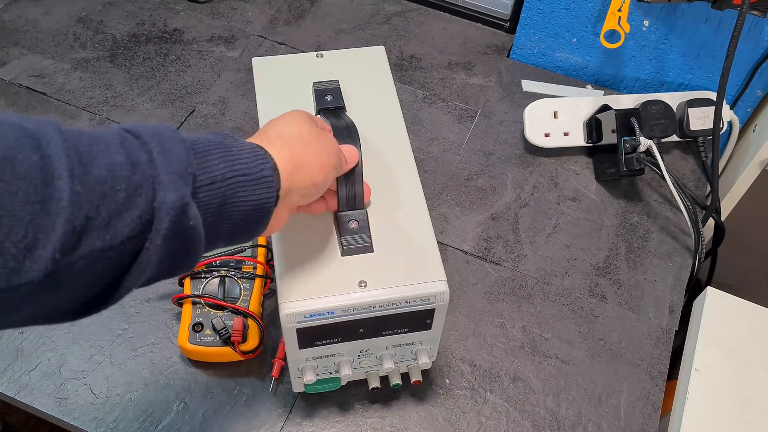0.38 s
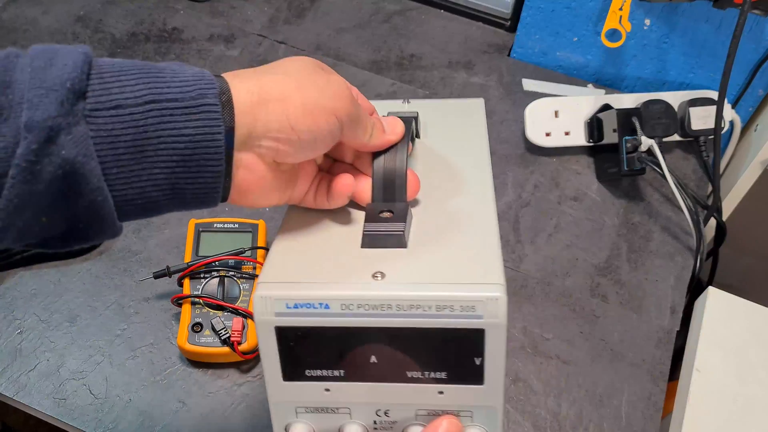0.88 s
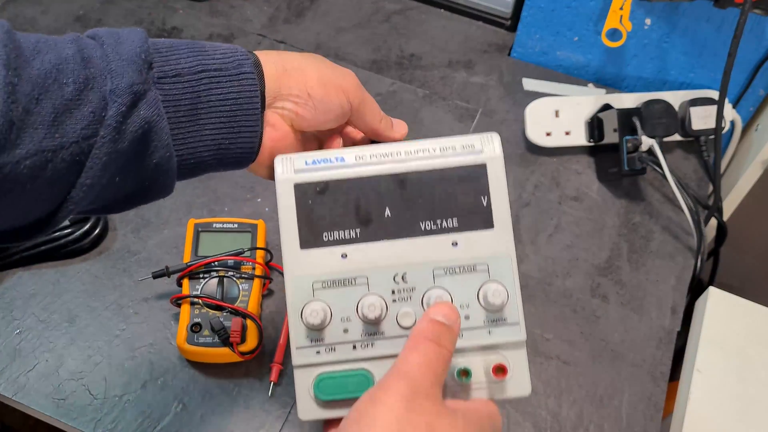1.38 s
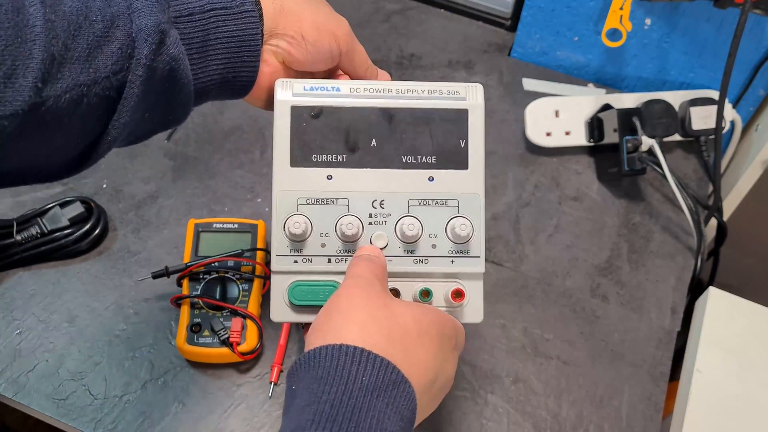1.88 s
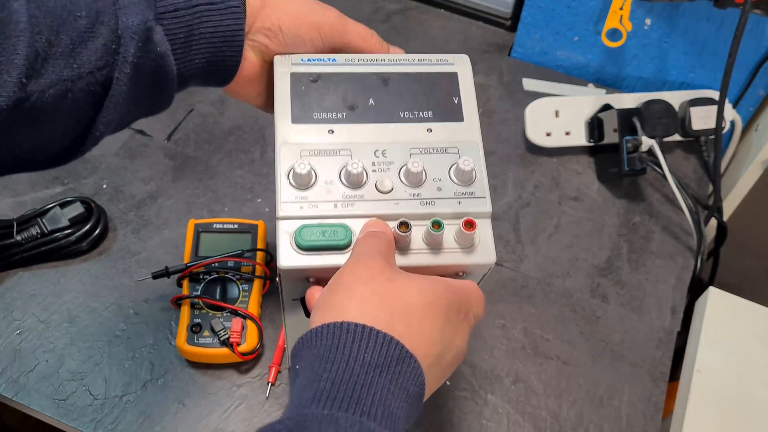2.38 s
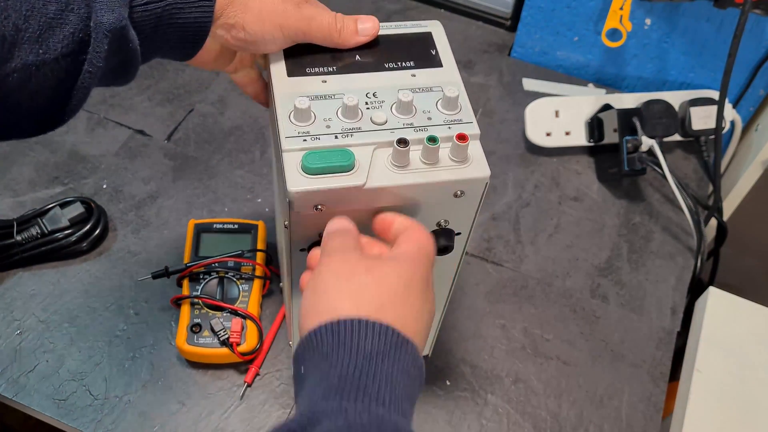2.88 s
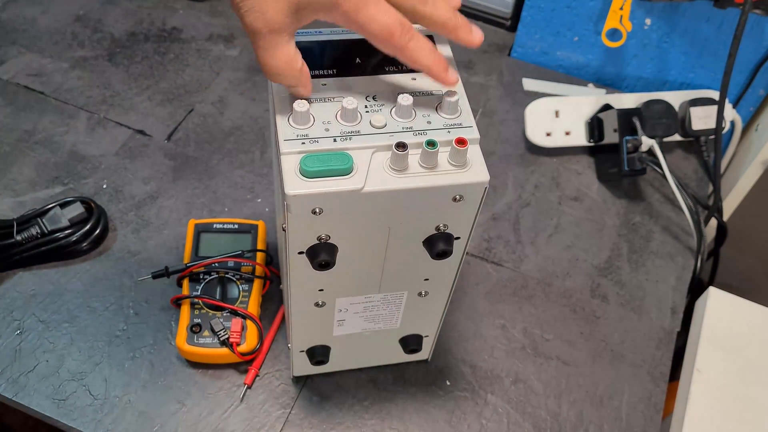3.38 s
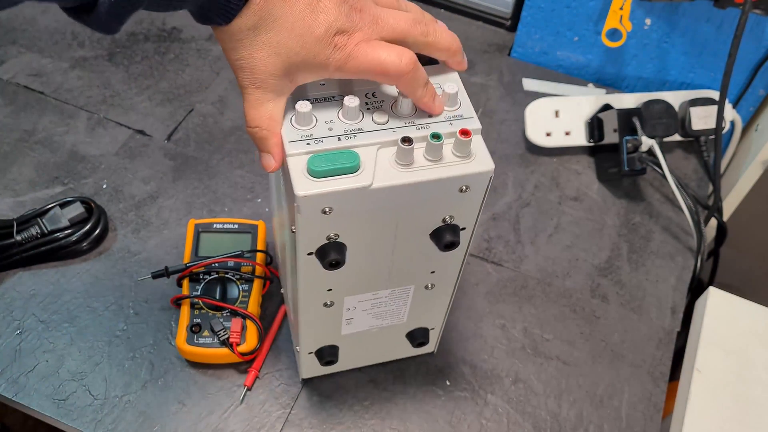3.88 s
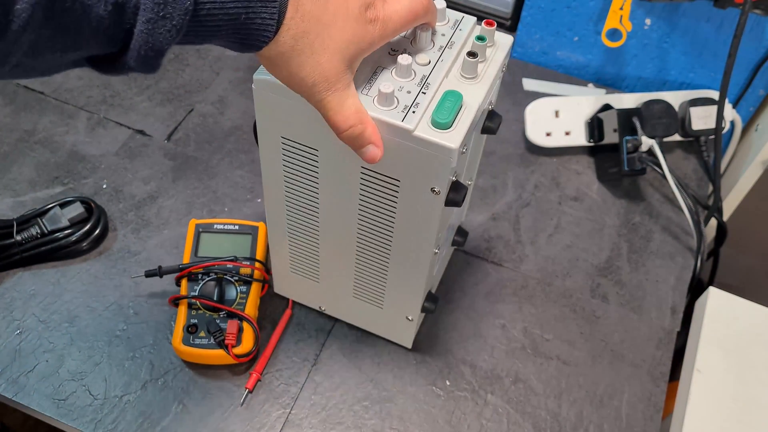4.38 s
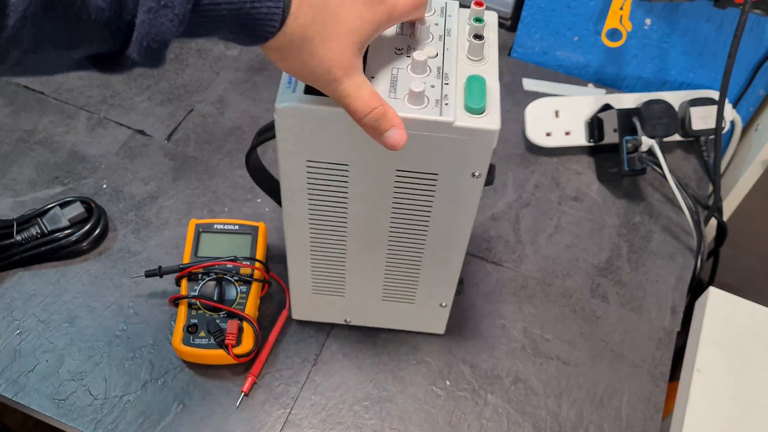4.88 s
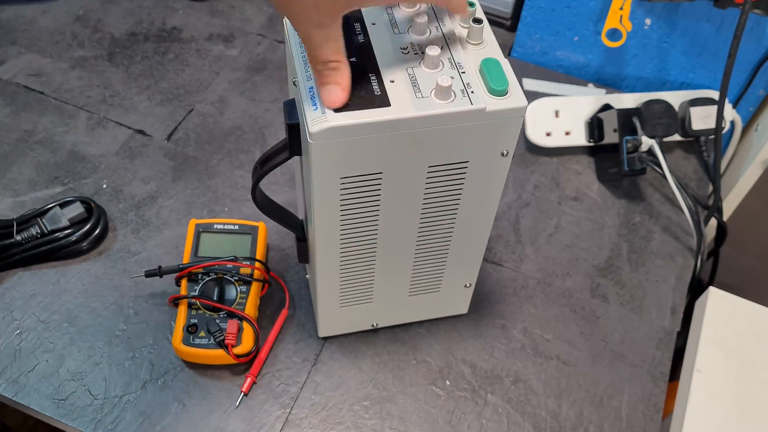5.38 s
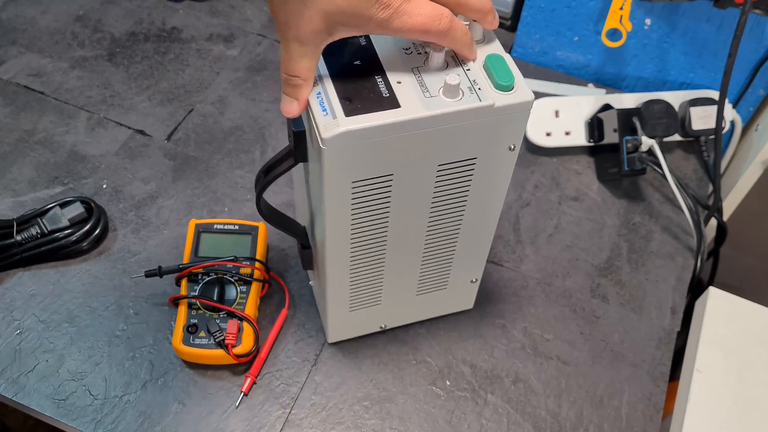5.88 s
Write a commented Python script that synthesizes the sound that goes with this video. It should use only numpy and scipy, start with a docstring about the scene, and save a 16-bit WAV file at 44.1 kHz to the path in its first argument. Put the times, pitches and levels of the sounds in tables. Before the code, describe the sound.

A metal-cased bench instrument is gripped, tipped and set on end with a hollow desk thump, then scraped around with small knocks and ticks.

```python
"""In a small room, a metal-cased bench instrument is gripped by its strap, tipped up, set on end
and turned on a wooden desk. The desk top booms in three low tones under its weight; knocks and ticks
ring the sheet-metal case through banks of resonances. Skin and metal scuff and slide as clumps of
random friction grains, and the desk trembles under the hands.
A faint fan-like hiss of coloured noise with two thin tones fills the room."""
import sys
import numpy as np
from scipy import signal
from scipy.fft import rfft, irfft, next_fast_len
from scipy.io import wavfile

SR = 44100
rng = np.random.default_rng(int(sys.argv[2]) if len(sys.argv) > 2 else 0)


def attenuation_scalar(level_db):
    """Turn a level in dB into a linear amplitude multiplier (20 dB per decade)."""
    decades = np.asarray(level_db, float) / 20
    return 10 ** decades


def materialize(psi):
    """Save the field psi as 16-bit PCM at rate SR to the path in sys.argv[1].

    A 1-D psi becomes a single channel; in a 2-D psi each row is a channel.
    """
    bounded = np.clip(np.atleast_2d(psi).T, -1, 1)
    quanta = np.round(bounded * 32767).astype(np.int16)
    wavfile.write(sys.argv[1], SR, quanta)


N = 264600  # samples: six seconds

# Low thuds of the desk: weight landing on it, and stick-slip bumps as the case is turned.
# Each row: start in seconds, peak level in dB, share of the upper desk tone from 0 to 1,
# time to fall by 60 dB in seconds.
DESK_THUDS = [(0.108, -59.5, 0.8, 0.3), (0.4, -52, 0.9, 0.17), (1.385, -22.5, 0.7, 0.18),
              (1.468, -26.5, 1, 0.086), (1.554, -22.5, 0.6, 0.22), (1.606, -18.5, 0.8, 0.1),
              (1.62, -15.5, 0.5, 0.27), (1.659, -20, 0.32, 0.15), (2.015, -34.5, 0.5, 0.23),
              (2.072, -36, 0.42, 0.52), (2.107, -36, 1, 0.13), (2.217, -28, 1, 0.16), (2.689, -52, 1, 0.27),
              (2.827, -32.5, 0.55, 0.8), (2.849, -31.5, 0, 0.39), (2.921, -43, 1, 0.94),
              (3.882, -37, 1, 0.18), (4.109, -45, 0.83, 0.18), (4.181, -41.5, 1, 0.25),
              (4.25, -45, 0, 0.36), (4.287, -43.5, 0.26, 0.34), (4.887, -43, 0.9, 0.2),
              (4.928, -41.5, 0.25, 0.19), (5.719, -49.5, 1, 0.12), (5.974, -50, 0.9, 0.3)]
# The desk's own tones, in Hz: sway, lower, upper.
DESK_TONES = (44.0, 65.5, 80.0)
SWAY_DB, PUSH_MS = -28, 13.7  # level of the sway tone; time constant of the soft push

# Knocks that ring the big panels. Each row: start in seconds, peak level in dB,
# favoured pitch in Hz, damping by the hand as a factor on the panel widths.
PANEL_KNOCKS = [(0.389, -46.5, 646, 2.5), (0.483, -40.5, 477, 1.3), (0.821, -36, 560, 0.64),
                (0.823, -42, 247, 0.38), (1.388, -25, 217, 0.86), (1.476, -34, 213, 0.55),
                (1.557, -38, 226, 1.1), (1.6, -18.5, 269, 0.4), (1.636, -21, 217, 2.3),
                (1.699, -29, 219, 2.2), (2.105, -38, 233, 0.94), (2.218, -29.5, 220, 0.6),
                (2.446, -46, 493, 0.97), (2.824, -33.5, 212, 0.44), (2.85, -30.5, 730, 1.2),
                (3.204, -40.5, 464, 4.2), (3.236, -37.5, 560, 2.4), (3.879, -34, 218, 0.63),
                (4.878, -38, 269, 2.6), (4.879, -42, 668, 1.2)]
# Resonances of the big panels. Each row: pitch in Hz, basic width in Hz, basic level in dB.
PANEL_MODES = [(148, 20, -1), (205, 22, 0), (250, 26, 2), (333, 18, 5), (434, 28, -4), (530, 20, 4),
               (590, 22, -4), (668, 20, -1), (752, 26, -7), (830, 30, -9)]
FAR_PANELS_DB = -13  # panels far from the favoured pitch drop no further than this, before luck

# Ticks and scuffs on the case. Each row: start in seconds, peak level of the bright part in dB,
# brightest pitch in Hz, 60 dB fall of the contact in seconds, body level in dB against the bright part.
CASE_TICKS = [(0.1004, -45, 2050, 0.032, 3.5), (0.387, -54, 2030, 0.063, 10.5),
              (0.4627, -53.5, 2070, 0.04, -14), (0.5755, -33, 2900, 0.016, 2),
              (0.822, -49.5, 4200, 0.031, -3), (0.897, -51.5, 4700, 0.026, -6),
              (1.388, -45, 2100, 0.01, 7.5), (1.6, -41, 2110, 0.077, 11.5), (2.0176, -44.5, 2160, 0.16, 1),
              (2.102, -35.5, 5980, 0.056, 1.5), (2.2196, -49, 2270, 0.047, 3),
              (2.2328, -49.5, 3940, 0.08, 8), (2.376, -53.5, 5600, 0.074, 3.5),
              (2.8255, -47.5, 2000, 0.087, 16), (2.851, -44, 3430, 0.027, -3),
              (2.8777, -45.5, 1990, 0.03, 6), (3.01, -60.5, 4370, 0.047, 1),
              (3.2003, -52.5, 2630, 0.025, 8.5), (3.236, -35, 2400, 0.026, 2.5),
              (3.395, -60, 1960, 0.028, 8.5), (3.506, -53, 2440, 0.12, -18), (3.5273, -42, 5050, 0.053, -9),
              (3.879, -59, 2200, 0.11, 13.5), (4.8786, -61, 2990, 0.099, 17), (5.035, -45, 3170, 0.02, -27),
              (5.194, -73, 7850, 0.014, -20), (5.5058, -39.5, 3900, 0.044, -22)]
# Upper resonances of the case shell. Each row: pitch in Hz, basic width in Hz, basic level in dB.
SHELL_MODES = [(1980, 120, -1), (2200, 120, -2), (2510, 110, 0), (2900, 130, 1), (3280, 140, 2),
               (3900, 110, 3), (4400, 160, -4), (5200, 180, -2), (5700, 200, -3), (6450, 220, -2),
               (7050, 250, -1), (8000, 250, -4)]
# Lower resonances of the case. Each row: pitch in Hz, basic width in Hz, basic level in dB.
BODY_MODES = [(953, 190, 6), (1215, 98, 12.5), (1406, 260, 5), (1542, 80, 11.5), (1767, 243, 6.5)]
# Brighter ticks carry more air. Each row: brightest pitch in Hz, air level in dB against the bright part.
AIR_IN_TICKS = [(2000, -40), (4500, -17), (6100, 3)]

# Sliding and rubbing strokes. Each row: time of the peak in seconds, scrape level in dB, rise in seconds,
# fall in seconds, air level in dB against the scrape, panel ring in dB against the scrape.
STROKES = [(0.116, -45.5, 0.038, 0.069, -13, -4.5), (0.48, -69, 0.31, 0.27, -5, 6),
           (0.822, -51, 0.0046, 0.06, 2, -3), (1.391, -42, 0.0051, 0.099, -19.5, 6),
           (1.614, -42, 0.091, 0.18, -13, 6), (2.029, -52.5, .1, 0.16, -11, 4.5),
           (2.109, -50, 0.11, 0.17, -10.5, 2.5), (1.74, -57.5, 0.15, 0.11, -5, 11),
           (2.378, -71, 0.022, 0.099, -8, 2), (2.44, -71, 0.13, 0.37, -10, 17),
           (2.842, -53.5, 0.081, 0.12, -14, 5), (3.234, -54, 0.037, 0.11, -14.5, 7),
           (3.537, -60, .1, 0.033, -11, -3), (4.13, -47.5, .27, 0.25, -14, -3),
           (4.254, -47, 0.16, .19, -14.5, 1.5), (4.874, -57, 0.091, 0.29, -12, -0.5),
           (5.04, -62, 0.52, 0.14, -12, 1.5), (5.474, -68.5, 0.19, 0.061, -1.5, -13),
           (6.0, -56.5, 0.17, .05, -12.5, -3)]
# Colour of the friction. Each row: pitch in Hz, relative level in dB per Hz.
SCRAPE_COLOUR = [(530, -30), (900, -11.5), (1750, -8), (2250, -8.5), (3930, -11), (9000, -18), (11700, -54),
                 (19800, -120)]
# The back edge sings as the case is turned on it.
# Each row: pitch in Hz, width in Hz, level in dB against the scrape.
EDGE_SQUEAL = [(3928, 99, -15.5), (3100, 950, -10.5), (6580, 900, -16)]
# Start and end of the turning, in seconds.
TURNING = (3.9, 5.3)
STROKE_SWING_DB = 25  # the scrape gains this much over the rise and loses it over the fall
STROKE_ROUNDING = 1.155  # 1 = a pointed peak; more = the stroke holds, then stops quickly
RASP_DB, RASP_FOLLOWS_AIR = -8, 0.68  # rasp against scrape in dB, plus this share of the air level
PANEL_SWING, AIR_SWING = 0.86, 0.97  # shares of the stroke's swing; the rasp swings with the air
SLIDE_BODY_DB = -3.5  # sliding stirs the lower modes less than a tap

# The desk trembling under the hands. Each row: time in seconds, level in dB.
TREMBLE_LEVEL = [(0.0, -69.5), (0.47, -65.5), (1.14, -71), (1.42, -68), (1.57, -35.5), (1.82, -52.5),
                 (2.17, -49.5), (2.62, -65), (3.68, -63), (4.24, -52), (4.58, -69), (5.1, -59), (5.4, -67),
                 (6.0, -65)]

# Stereo width of the nearby reflections. Each row: pitch in Hz, side filter level in dB.
HANDLING_WIDTH = [(60, -18), (180, -29.5), (550, -11.5), (1650, -0.5), (4970, -0.5), (15000, -0.5)]
# Balance between the ears. Each row: pitch in Hz, left over right in dB.
LEFT_LEAN = [(60, -1), (240, 0), (950, -3), (3770, -4), (15000, -4)]
SCATTER_T60_S = 0.08  # 60 dB fall of the nearby reflections
ROOM_T60_S, ROOM_DB, WALL_CUT_HZ = 0.14, -6, 3900  # fall before wall dulling, send level, dulling pitch

# Colour of the room hiss. Each row: pitch in Hz, relative level in dB.
HISS_COLOUR = [(53, -64), (90, -46), (184, -9.5), (368, -1.5), (393, -7), (544, -6), (721, -9.5),
               (858, -13), (1020, -14.5), (1640, -15.5), (1790, -20), (13200, -40), (16000, -44)]
# Stereo width of the hiss. Each row: pitch in Hz, side over mid in dB.
HISS_SIDE = [(60, 22), (240, -13.5), (950, 0), (3770, 0), (15000, 1)]
# Thin tones in the room. Each row: pitch in Hz, average (rms) level in dB.
THIN_TONES = [(366.1, -74), (1669, -79)]
HISS_DB = -63.5  # average level of the middle of the hiss

# Colour of the microphone. Each row: pitch in Hz, level in dB.
MICROPHONE_COLOUR = [(6000, -1.5), (7500, -1.5), (8800, -8.5), (10500, -4), (12500, 1), (15000, 3)]
CUTOFF_HZ = 16400


def rms_one(x):
    """Scale a sound to an average (rms) level of 1."""
    return x / np.sqrt(np.mean(x ** 2) + 1e-20)


def peak_one(x):
    """Scale a sound to a peak of 1."""
    return x / (np.abs(x).max() + 1e-20)


def in_time(rows, **outside):
    """Draw straight lines between timed rows, one curve for each column."""
    s, *columns = np.transpose(rows)
    return [np.interp(np.arange(N) / SR, s, column, **outside) for column in columns]


def at_hz(points, hz):
    """Read a curve at a pitch, with pitch on a log scale."""
    point_hz, values = np.transpose(points)
    return np.interp(np.log(hz), np.log(point_hz), values)


def band(x, low_hz, high_hz):
    """Keep only what lies between two pitches."""
    edges_hz = [low_hz, min(high_hz, 0.45 * SR)]
    return signal.sosfilt(signal.butter(2, edges_hz, "band", fs=SR, output="sos"), x)


def shaped(x, spectrum):
    """Colour a sound by a curve of dB over pitch."""
    hz = np.maximum(np.arange(N // 2 + 1) * SR / N, 1)
    return irfft(rfft(x) * attenuation_scalar(at_hz(spectrum, hz)), N)


def resonate(x, hz, width_hz):
    """Pass a sound through one resonance with gain 1 on top; a narrower one rings longer."""
    r = np.exp(-np.pi * width_hz / SR)
    feedback = [1, -2 * r * np.cos(2 * np.pi * hz / SR), r * r]
    return signal.lfilter([(1 - r * r) / 2, 0, (r * r - 1) / 2], feedback, x + 1e-18)


def ring_modes(x, modes, extra_db, widen):
    """Ring resonances side by side, with alternating signs."""
    out = 0
    for k, ((hz, width_hz, db), more_db) in enumerate(zip(modes, extra_db)):
        out = out + (-1) ** k * attenuation_scalar(db + more_db) * resonate(x, hz, widen * width_hz)
    return out


def add(out, s, sound):
    """Mix a sound in at a time in seconds."""
    at = round(s * SR)
    out[at:at + len(sound)] += sound[:N - at]


def grit(shape, spread_db):
    """Dense contact grains: random sign, sizes with a long tail."""
    size_db = spread_db * np.minimum(rng.exponential(1, shape), 4)
    return rng.standard_normal(shape) * attenuation_scalar(size_db)


def contact(t60, grains):
    """A burst of grains that starts within a millisecond and dies away."""
    t = np.arange(len(grains)) / SR
    return grains * attenuation_scalar(-60 * t / max(t60, 0.004)) * np.minimum(t / 0.00076, 1)


def thuds():
    """A soft push sets the desk modes going; where and how the weight rests sets their mix and damping."""
    out, t = np.zeros(N), np.arange(SR // 2) / SR
    sway, lower, upper = [np.sin(2 * np.pi * hz * t) for hz in DESK_TONES]
    for s, peak_db, share, t60 in DESK_THUDS:
        share = np.clip(share, 0, 1)
        swing = share * upper + (1 - share) * lower + attenuation_scalar(SWAY_DB) * sway
        push = (1 - np.exp(-1000 * t / PUSH_MS)) ** 2
        dying = attenuation_scalar(-60 * t / max(t60, 0.03))
        add(out, s, -attenuation_scalar(peak_db) * peak_one(swing * push * dying))
    return out


def knocks():
    """One firm blow and a short rattle ring the panels, most near the favoured pitch."""
    out, panel_hz = np.zeros(N), np.array(PANEL_MODES)[:, 0]
    grains = rng.standard_normal((len(PANEL_KNOCKS), SR // 4))
    luck_db = rng.normal(0, 3.6, (len(PANEL_KNOCKS), len(PANEL_MODES)))
    for (s, peak_db, hz, damping), grain, luck in zip(PANEL_KNOCKS, grains, luck_db):
        blow = signal.unit_impulse(len(grain)) + 0.041 * contact(0.061, grain)
        near_db = np.maximum(-60.0 * np.log2(panel_hz / hz) ** 2, FAR_PANELS_DB) + luck
        ringing = ring_modes(blow, PANEL_MODES, near_db, widen=max(damping, 0.4))
        add(out, s, attenuation_scalar(peak_db) * peak_one(ringing))
    return out


def ticks():
    """The contact drives the shell modes near its brightest pitch, the lower body modes and the air."""
    out, shell_hz = np.zeros(N), np.array(SHELL_MODES)[:, 0]
    grains = grit((len(CASE_TICKS), SR // 4), spread_db=0.5)
    luck_db = rng.normal(0, 1.8, (len(CASE_TICKS), len(SHELL_MODES)))
    for (s, peak_db, hz, t60, body_db), grain, luck in zip(CASE_TICKS, grains, luck_db):
        burst = contact(t60, grain)
        near_db = -24.0 * np.log2(shell_hz / hz) ** 2 + luck
        shell = peak_one(ring_modes(burst, SHELL_MODES, near_db, widen=1.18))
        bright = peak_one(shell + 0.55 * peak_one(band(burst, 1530, 7200)))
        lower = peak_one(ring_modes(burst, BODY_MODES, luck, widen=0.78))
        air = peak_one(band(burst, 7200, 12800))
        tick = bright + attenuation_scalar(body_db) * lower + attenuation_scalar(at_hz(AIR_IN_TICKS, hz)) * air
        add(out, s, attenuation_scalar(peak_db) * tick)
    return out


def slide_layers():
    """Friction grains clump as the edge catches and slips; case modes swell and fade as contact moves."""
    catching = rms_one(band(rng.standard_normal(N), 7.5, 90))
    grains = grit((3, N), spread_db=4.5) * attenuation_scalar(0.94 * catching)
    case_modes = BODY_MODES + SHELL_MODES
    shifting = band(rng.standard_normal((len(case_modes), N)), 6.5, 15.1)
    is_lower = np.arange(len(case_modes)) < len(BODY_MODES)
    moving_db = SLIDE_BODY_DB * is_lower[:, None] + 3.2 * rms_one(shifting)
    ringing = ring_modes(grains[0], case_modes, moving_db, widen=0.6)
    edge = shaped(rms_one(grains[0]) + 0.73 * rms_one(ringing), SCRAPE_COLOUR)
    scrape = rms_one(band(edge, 430, 4740))
    rasp = rms_one(band(edge, 4400, 7000))
    turning, = in_time([(s, 1) for s in TURNING], left=0, right=0)
    for hz, width_hz, db in EDGE_SQUEAL:
        scrape = scrape + turning * attenuation_scalar(db) * rms_one(resonate(grains[0], hz, width_hz))
    panels = rms_one(ring_modes(grains[1], PANEL_MODES, np.zeros(len(PANEL_MODES)), widen=0.96))
    air = rms_one(band(grains[2], 5200, 19700))
    return [scrape, rasp, panels, air]


def slides():
    """Each stroke swells and fades the friction layers; overlapping strokes add by power."""
    power, t = np.zeros((4, N)), np.arange(N) / SR
    for s, scrape_db, rise, fall, air_db, panel_db in STROKES:
        away = np.maximum((s - t) / max(rise, 0.002), (t - s) / max(fall, 0.002))
        down_db = STROKE_SWING_DB * away ** STROKE_ROUNDING
        rasp_db = RASP_DB + RASP_FOLLOWS_AIR * air_db
        layers_db = np.array([-down_db, rasp_db - AIR_SWING * down_db,
                              panel_db - PANEL_SWING * down_db, air_db - AIR_SWING * down_db])
        near = down_db < 2 * STROKE_SWING_DB
        power[:, near] += attenuation_scalar(scrape_db + layers_db[:, near]) ** 2
    return np.sum(np.sqrt(power) * slide_layers(), axis=0)


def tremble():
    """Unsteady hand force keeps the desk modes stirring."""
    force = band(rng.standard_normal(N), 17, 60)
    ringing = 0.5 * force + sum(resonate(force, hz, 12.0) for hz in DESK_TONES)
    level_db, = in_time(TREMBLE_LEVEL)
    return attenuation_scalar(level_db) * rms_one(ringing)


def two_ports(x):
    """Near reflections off desk and case reach the two openings differently, more so in the treble."""
    t = np.arange(SR // 10) / SR
    scatter = rng.standard_normal(len(t)) * attenuation_scalar(-60 * t / SCATTER_T60_S)
    scattered = signal.fftconvolve(x, scatter / np.linalg.norm(scatter))[:N]
    side = shaped(scattered, HANDLING_WIDTH)
    half_lean = np.array(LEFT_LEAN) * [1, 0.5]  # half the dB for each ear
    return np.array([shaped(x + side, half_lean), shaped(x - side, half_lean * [1, -1])])


def room(x):
    """Eight feedback delays a side act as wall echoes, duller on every round, with the bass held back."""
    size = next_fast_len(N + SR)
    w = 2 * np.pi * np.arange(size // 2 + 1) / size
    dull = 1 / (1 + 1j * w * SR / (2 * np.pi * WALL_CUT_HZ))
    echoes = np.zeros((2, len(w)), complex)
    for k, lag in enumerate(rng.uniform(0.007, 0.035, 16) * SR):
        loop = attenuation_scalar(-60 * lag / SR / ROOM_T60_S) * dull * np.exp(-1j * w * lag)
        echoes[k % 2] += (-1) ** (k // 2) * loop / (1 - loop)  # the sum of all rounds
    return irfft(echoes * rfft(band(x, 554, 14000), size), size)[:, :N]


def room_hiss():
    """Steady stereo hiss, and thin tones of narrowly filtered noise that waver a little."""
    mid, side = shaped(rng.standard_normal((2, N)), HISS_COLOUR)
    hiss = (mid + shaped(side, HISS_SIDE) * [[1], [-1]]) / np.std(mid)
    tones = sum(attenuation_scalar(db) * rms_one(resonate(rng.standard_normal(N), hz, 3.3)) for hz, db in THIN_TONES)
    return attenuation_scalar(HISS_DB) * hiss + tones


def scene():
    """Handling sounds heard directly and through the room, over the steady hiss."""
    handling = thuds() + tremble() + knocks() + ticks() + slides()
    return two_ports(handling) + attenuation_scalar(ROOM_DB) * room(handling) + room_hiss()


def roll_off(x):
    """The treble ends steeply here."""
    return signal.sosfilt(signal.butter(12, 16490, fs=SR, output="sos"), x)


def record(dry):
    """The microphone dips near 9 kHz and a steep filter cuts the top."""
    coloured = shaped(dry, MICROPHONE_COLOUR)
    top_cut = signal.cheby2(12, 70, CUTOFF_HZ, fs=SR, output="sos")
    return roll_off(signal.sosfilt(top_cut, coloured))


dry = scene()
out = record(dry)
materialize(out)
```